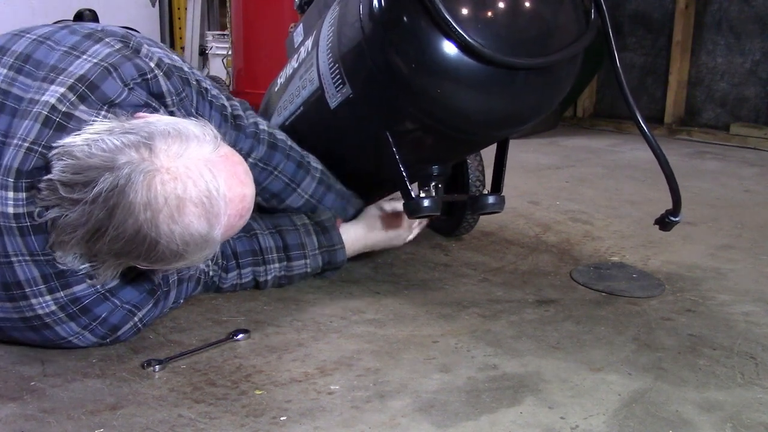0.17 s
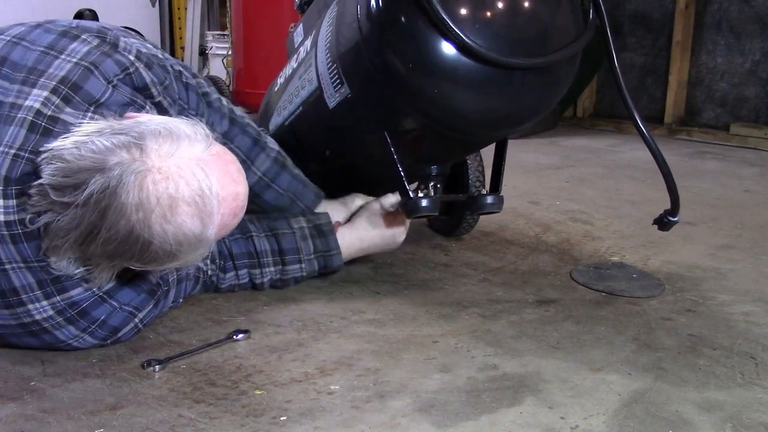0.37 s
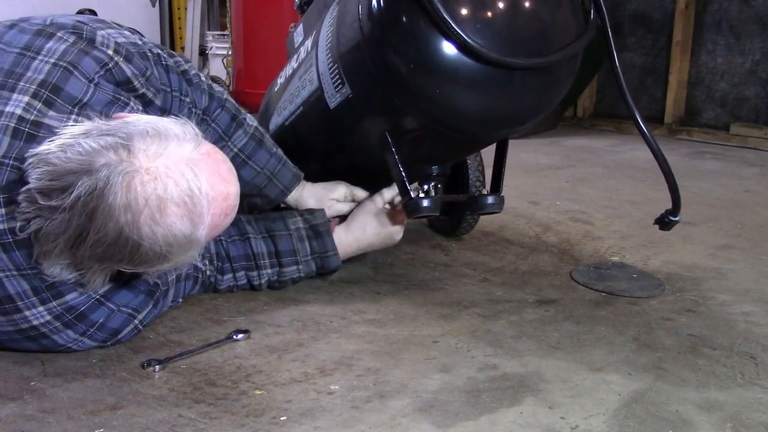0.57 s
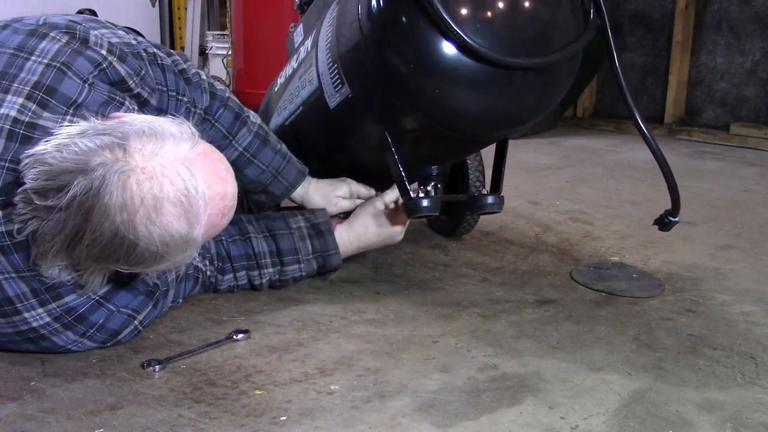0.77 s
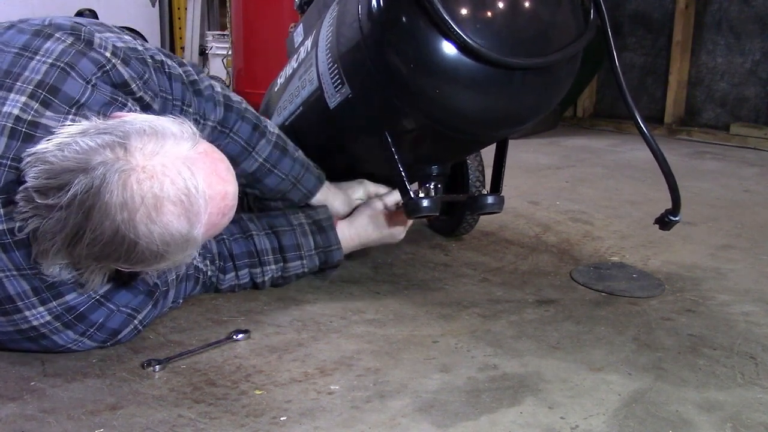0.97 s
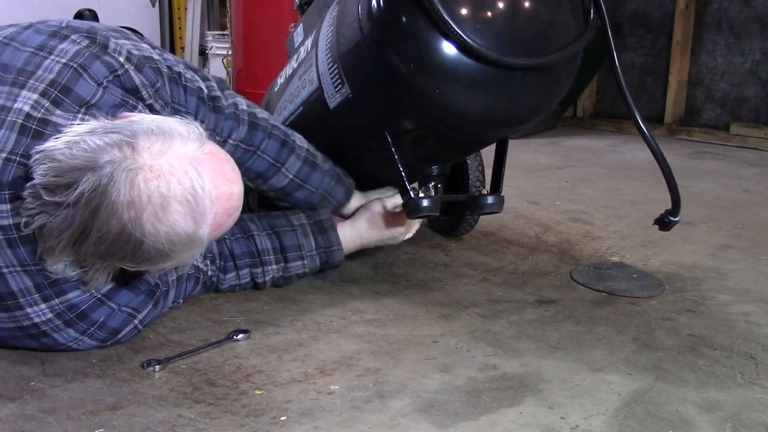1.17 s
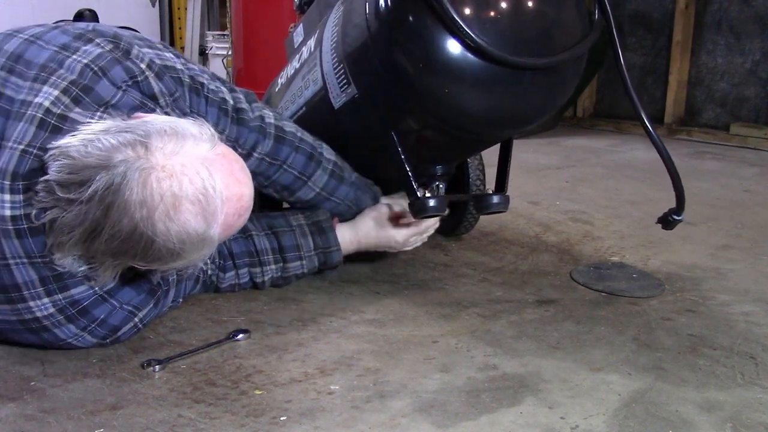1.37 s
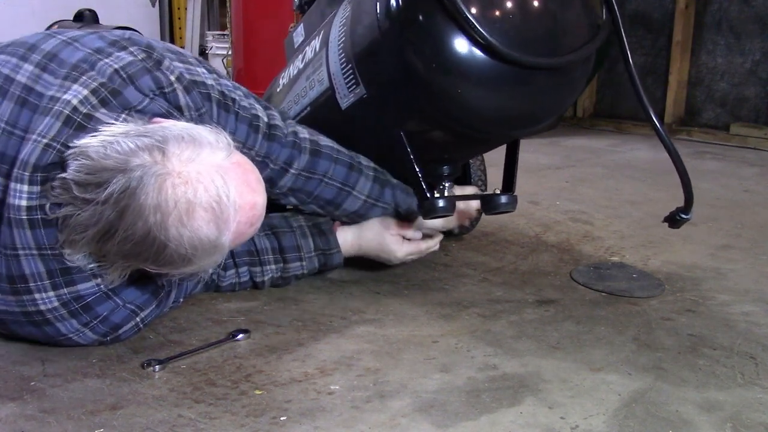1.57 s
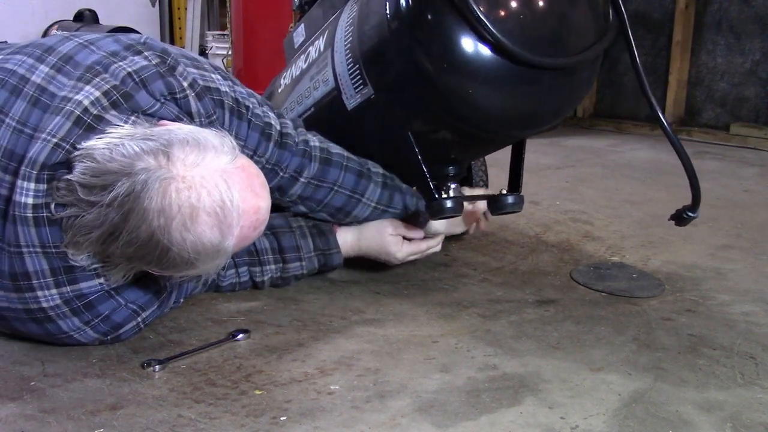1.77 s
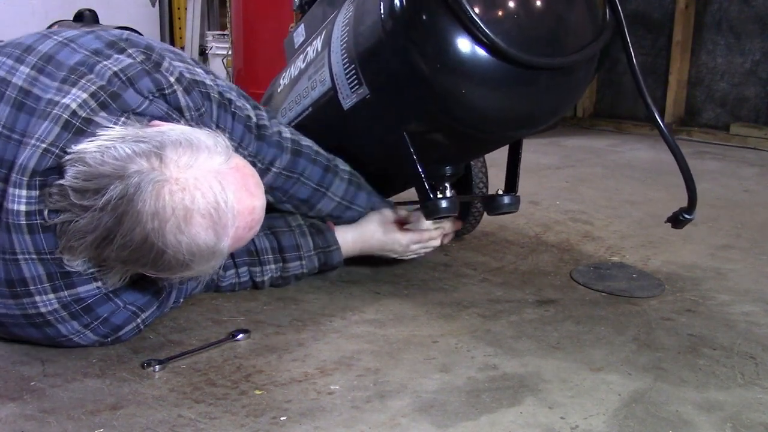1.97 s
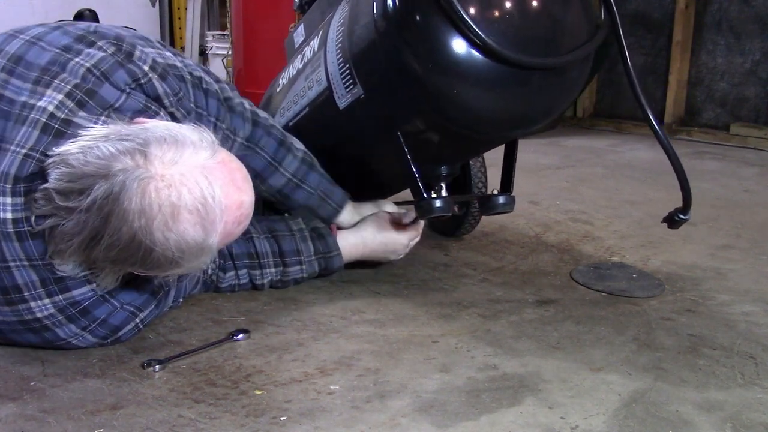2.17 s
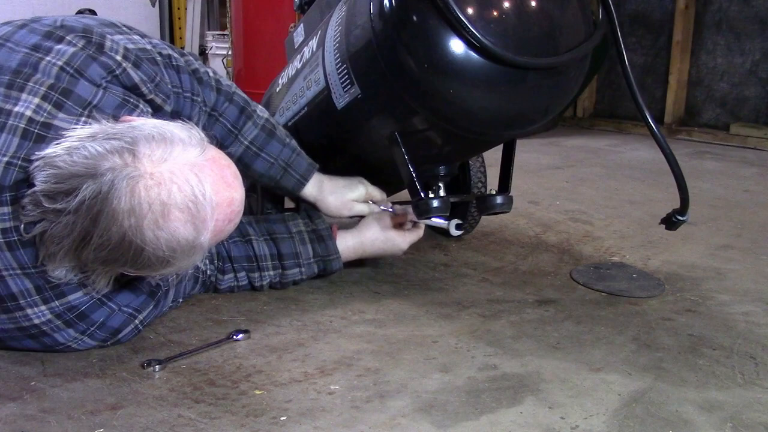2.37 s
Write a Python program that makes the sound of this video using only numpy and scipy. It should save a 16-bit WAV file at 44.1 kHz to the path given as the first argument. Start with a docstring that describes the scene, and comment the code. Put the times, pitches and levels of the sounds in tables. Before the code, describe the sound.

A metal wrench taps and clanks irregularly on a hollow steel tank's drain valve, each knock ringing briefly; air hisses at first, fades, swells faintly near one second, then nearly vanishes; close microphone, concrete-floored workshop.

```python
"""Wrench on a leaking tank valve

A wrench knocks on the drain valve of a steel tank while the last air whistles out, in a concrete-floored workshop.
Each knock ticks in the tool (short modes and a noise crack) and rings many decaying modes of the tank shell.
The hiss of shaped noise is loud at first, dips near 0.7 s, swells to 1.14 s, then stays low.
Room tone, a faint hum and wall reflections surround it."""
import sys
import numpy as np
from scipy import signal
from scipy.fft import rfft, irfft, next_fast_len
from scipy.io import wavfile
from scipy.ndimage import map_coordinates

SR = 44100
rng = np.random.default_rng(int(sys.argv[2]) if len(sys.argv) > 2 else 0)


def write(x):
    x = np.atleast_2d(x).T
    wavfile.write(sys.argv[1], SR, np.round(np.clip(x, -1, 1) * 32767).astype(np.int16))


N = 112455

# Wrench knocks: start_s, relative force_db at 450, 1000, 1600, 2300, 3300, 4700 and 6500 Hz,
# extra low_bell_db, extra high_bell_db, relative tool tick_db
KNOCKS = [(.188, -34, -43.5, -32, -36, -51, -42, -42, -12, 11, -58),
          (.218, -32, -70, -23, -26, -28.5, -10.5, -52, 15, -4, -45),
          (.235, -26.5, -25.5, -18, -18, -20.5, -19.5, -30, 6.5, 14.5, -34),
          (.451, -30, -25.5, -24, -28.5, -32, -33, -26.5, -20, 8.5, -39),
          (.537, -27, -30, -12.5, -15.5, -20, -25, -18, 0.5, -20, -23.5),
          (.602, -36.5, -21, -12.5, -23.5, -38, -22, -20, 7.5, 4, -63),
          (.660, -28, -25.5, -13.5, -10.5, -14, -12, -13.5, -8, 10.5, -13.5),
          (.693, -39.5, -37, -50, -14, -42, -13, -27, -14, -4, -30),
          (.820, -62, -33, -30, -32, -45, -26.5, -37, -7, -2, -47),
          (.830, -27.5, -24.5, -28, -23.5, -28.5, -35.5, -27, 5, 8.5, -52),
          (.858, -37, -24, -31, -39, -52, -41, -44, -14, -10, -48),
          (1.042, -54, -36, -31, -41, -43, -57, -57, 6, -1, -70),
          (1.060, -30, -21.5, -3.5, -12, -7, -11, -19.5, -3.5, 0, -25),
          (1.103, -38, -21, -10.5, -13, -17.5, -13, -35, 2, -25, -43),
          (1.174, -33, -27.5, -22, -24, -19.5, -16.5, -35, -5, -3, -44.5),
          (1.542, -64, -68, -50, -52, -47, -42, -28, -8, -3, -46),
          (1.888, -43, -47, -37, -48, -56, -62, -52, 0, -10, -58),
          (1.901, -32, -30.5, -29, -41, -37, -43, -50, 2, -11, -50),
          (1.916, -39, -43, -20, -32, -19.5, -20, -21.5, -4, -20, -35),
          (1.922, -33.5, -26, -15.5, -13.5, -18.5, -21, -24, -0.5, 8, -66),
          (2.051, -47, -20.5, -39, -23, -37, -22, -28, 10, -8.5, -36.5),
          (2.063, -30, -14, -14.5, -12, -18.5, -13.5, -17, -1, 7, -27),
          (2.227, -29.5, -18.5, -13, -23, -27, -25.5, -23, 3, -23, -26.5)]


def amp(db):
    """Decibels to amplitude ratio."""
    return 10 ** (np.asarray(db) / 20)


def along(points, hz):
    """Interpolate (Hz, value) points on a log frequency axis."""
    point_hz, value = np.transpose(points)
    return np.interp(np.log(hz + 1), np.log(point_hz + 1), value)


def filtered(x, response):
    """Multiply the spectrum of x by a complex response of frequency."""
    size = next_fast_len(N + SR // 2)
    spectrum = rfft(x, size) * response(np.fft.rfftfreq(size, 1 / SR))
    return irfft(spectrum, size)[..., :N]


def wobble(rate_hz):
    """Smooth random curve through rate_hz random knots a second."""
    knots = rng.standard_normal(int(N * rate_hz / SR) + 4)
    return map_coordinates(knots, [np.arange(N) * rate_hz / SR])


def rung(hz, t60_s, gains_db, scatter_db, rise_s, size):
    """Modes build up and decay exponentially; each knock (row) has its own strengths and phases."""
    t = np.arange(size) / SR
    decay_per_s = np.log(1000) / t60_s
    modes = np.exp(np.outer(2j * np.pi * hz - decay_per_s, t)).astype(np.complex64)
    modes = modes * (1 - np.exp(-np.outer(1 / rise_s, t))).astype(np.float32)
    chance = rng.standard_normal((len(gains_db), 2, len(hz)))
    strength = amp(gains_db + scatter_db * chance[:, 0])
    phase = np.exp(10j * chance[:, 1])
    return ((strength * phase).astype(np.complex64) @ modes).imag, t


def laid(rings):
    """Add each ring at the start of its knock."""
    out = np.zeros(N + SR)
    for knock, ring in zip(KNOCKS, rings):
        out[round(knock[0] * SR):][:len(ring)] += ring
    return out[:N]


def workshop():
    """Steady room tone of coloured noise with a faint wavering hum; returns mid and side."""
    # Room tone spectrum: frequency_hz, relative level_db
    floor_points = [(15, -61), (25, -19), (110, -16.5), (156, -8), (254, -3.5), (1010, -8), (2030, -14),
                    (4680, -19.5), (9690, -25), (15700, -32.5)]
    # Room tone width: frequency_hz, side_over_mid_db
    floor_side = [(30, 1), (200, -7), (1000, -13.5), (5000, -13), (14000, -25)]
    floor_rms_db = -52.5  # of the mid
    hum_hz, hum_peak_db, hum_waver_db = 117.5, -66, 3.5

    def colour(f):
        mid_gain = amp(along(floor_points, f))
        return mid_gain * [f > 0, amp(along(floor_side, f))]

    mid, side = filtered(rng.standard_normal((2, N)), colour)
    hum_level = amp(hum_peak_db + hum_waver_db * wobble(23.0))
    hum = hum_level * np.sin(2 * np.pi * hum_hz * np.arange(N) / SR)
    return amp(floor_rms_db) * np.array([mid, side]) / np.std(mid) + [hum, 0 * hum]


def walls(x, t60_points):
    """Room reflections: a noise tail in which each frequency decays at its own speed."""
    hz, t, noise = signal.stft(rng.standard_normal(SR), SR, nperseg=256)
    decay = amp(-60 * t / along(t60_points, hz)[:, None])
    tail = signal.istft(noise * decay, SR, nperseg=256)[1]
    return signal.fftconvolve(x, tail / np.linalg.norm(tail))[:N]


def leak():
    """Turbulent air: a broad rush plus whistling bands, with a drawn level curve and small random flutter."""
    # Leak envelope: time_s, relative level_db
    air = [(0.0, -43.5), (0.218, -45.5), (0.56, -50.5), (0.69, -81), (0.824, -70), (1.14, -54),
           (1.336, -67), (1.6, -68)]
    # Whistling bands: centre_hz, width_hz (of each of two cascaded sections), gain_db
    valve = [(4510, 530, 18), (7440, 960, 12), (10330, 770, 2), (12400, 2200, -3.5)]
    # Broad rush: frequency_hz, gain_db
    jet = [(60, -57), (150, 12), (400, 15.5), (1000, 4), (2500, 5), (4000, 15.5), (6000, -3), (12000, -10),
           (15000, -17)]
    time_s, level_db = np.transpose(air)
    level_db = np.interp(np.arange(N) / SR, time_s, level_db)
    level = amp(level_db + 1.4 * wobble(12.0) + 0.39 * wobble(69))

    def bands(f):
        total = 0
        for k, (centre, width, gain_db) in enumerate(valve):
            section = 1j * f * width / (centre ** 2 - f * f + 1j * f * width)
            total = total + (-1) ** k * amp(gain_db) * section ** 2
        return total

    noise = rng.standard_normal((2, N))
    whistle = filtered(noise[0], bands)
    rush = filtered(noise[1], lambda f: amp(along(jet, f)))
    return level * (whistle + rush)


def wrench():
    """Short bright ticks: the tool's fast-decaying modes plus a crack of differentiated noise."""
    # Tool modes: frequency_hz, relative level_db, t60_s
    tool = [(4810, 4.5, 0.036), (5520, 3, 0.019), (7830, -4.5, 0.019), (8520, -3, 0.028), (9330, -7, 0.012),
            (12640, -5.5, 0.011)]
    crack_db, crack_t60_s, lowpass_hz = 2.5, 0.0043, 11200
    rise_s = 0.00051
    hz, db, t60_s = np.transpose(tool)
    tick_db = np.array(KNOCKS)[:, -1:]
    rings, t = rung(hz, t60_s, tick_db + db, scatter_db=2.5, rise_s=3.1 / hz, size=SR // 8)
    crack = np.diff(rng.standard_normal(rings.shape), prepend=0)
    crack = crack * amp(tick_db + crack_db - 60 * t / crack_t60_s)
    ticks = laid((rings + crack) * (1 - np.exp(-t / rise_s)))

    def lowpass(f):
        ratio = f / lowpass_hz
        return 1 / (1 - ratio ** 2 + 1j * ratio) ** 2

    return filtered(ticks, lowpass)


def tank(count=480):
    """Strong shell modes over weak ones spread up to 13.65 kHz; two bell modes swell more slowly."""
    # Frequencies of the strong modes: frequency_hz
    shell_hz = [347, 455, 515, 668, 855, 977, 1015, 1395, 1585, 1707, 1790, 1915, 2085, 2196, 2239, 2342,
                2407, 2510, 2552, 2593, 2729, 3128, 3354, 3770, 4650]
    # The same strong modes: relative level_db, t60_s
    shell = [(16.5, 0.21), (8, 1), (11.5, 0.72), (5.5, 0.41), (12.5, 0.28), (10, 0.39), (15, 0.29),
             (13, 0.096), (3.5, 0.21), (4, 0.37), (10, 0.12), (6.5, 0.51), (13, 0.19), (10, 0.19),
             (-4, 0.13), (6, 0.35), (-1.5, 0.66), (9, 0.31), (1.5, 0.49), (2.5, 0.56), (1, 0.61),
             (2.5, 0.32), (7, 0.32), (6, 0.21), (7, 0.24)]
    # Weak mode levels: frequency_hz, relative level_db
    crowd_levels = [(120, -17), (250, -7.5), (450, 0.5), (600, -5), (1000, 0), (1500, -6), (2300, 3),
                    (3200, 1.5), (3950, -6), (4700, -3), (5350, -8), (5900, -12.5), (6800, -19),
                    (10000, -39.5), (14000, -52)]
    # Weak mode decay before random spread: frequency_hz, t60_s
    crowd_t60 = [(200, 0.52), (700, 0.39), (2000, 0.29), (4500, 0.35), (7000, 0.18), (13000, 0.85)]
    # Frequencies of the knock force columns: frequency_hz
    force_hz = [450, 1000, 1600, 2300, 3300, 4700, 6500]
    # The two bell modes, low and high: frequency_hz
    bell_hz = [515, 1015]
    # Their build-up time constants: rise_s
    bell_rise_s = [0.0068, 0.034]
    shell_db, scatter_db, t60_spread = -17, 2, 0.22
    rise_cycles, highpass_hz = 2.27, 104.4
    chatter_db, chatter_hz = 1.5, 140

    crowd_hz = 150 + 13500 * ((np.arange(count) + rng.random(count)) / count) ** 2
    strong_db, strong_t60_s = np.transpose(shell)
    hz = np.r_[shell_hz, crowd_hz]
    db = np.r_[strong_db, along(crowd_levels, crowd_hz)]
    weak_t60_s = along(crowd_t60, crowd_hz) * np.exp(t60_spread * rng.standard_normal(count))
    t60_s = np.r_[strong_t60_s, weak_t60_s]

    force_db = []
    for _, *dbs, low_db, high_db, _ in KNOCKS:
        bell_db = low_db * (hz == min(bell_hz)) + high_db * (hz == max(bell_hz))
        force_db.append(along(list(zip(force_hz, dbs)), hz) + bell_db)

    bell = np.isin(hz, bell_hz)
    rise_s = np.where(bell, np.interp(hz, bell_hz, bell_rise_s), rise_cycles / hz)
    rings, t = rung(hz, t60_s, shell_db + db + np.array(force_db), scatter_db * ~bell, rise_s, SR * 3 // 4)
    rings = laid(rings * np.minimum(1, 10 * (t[-1] - t)))  # 0.1 s fade-out

    # The loose tool damps the shell unevenly: the treble flickers
    treble = filtered(rings, lambda f: f > 1200)
    rings = rings + treble * (amp(chatter_db * wobble(chatter_hz)) - 1)
    return filtered(rings, lambda f: (1j * f / (highpass_hz + 1j * f)) ** 2)


def scene():
    """Tank, wrench and leak in the centre; reflections and room tone spread as mid and side."""
    # Mid reflections: frequency_hz, t60_s
    room = [(200, 2.55), (2000, 1.15), (5000, 1.22), (10000, 0.43)]
    # Side reflections from the nearest walls: frequency_hz, t60_s
    side_room = [(200, 0.1), (2000, 0.14), (10000, 0.12)]
    # Colour of the side reflections: frequency_hz, gain_db
    side_colour = [(250, -19), (1000, 1.5), (4000, 5.5), (6000, 9), (8500, 2.5), (14000, 10)]
    room_db, room_side_db, left_db = -21.5, -24.5, 0.16
    near = tank() + wrench() + leak()
    room_mid = amp(room_db) * walls(near, room)
    room_side = amp(room_side_db) * walls(near, side_room)
    room_side = filtered(room_side, lambda f: amp(along(side_colour, f)))
    mid, side = [room_mid, room_side] + workshop()
    return amp([[left_db], [-left_db]]) * np.array([near + mid + side, near + mid - side])


def record(dry):
    """Gain sinks as smoothed power rises, then peaks are rounded and the treble is cut at a band limit."""
    duck_from_db, duck_share, smoothing_s = -37, 0.16, 1
    ceiling, top_hz = .93, 15850
    keep = np.exp(-1 / (smoothing_s * SR))
    power = signal.lfilter([1 - keep], [1, -keep], np.mean(dry ** 2, axis=0))
    excess_db = np.maximum(0, 10 * np.log10(power + 1e-12) - duck_from_db)
    ducked = dry * amp(-duck_share * excess_db)
    rounded = ducked / (1 + np.abs(ducked / ceiling) ** 8) ** .125
    return filtered(rounded, lambda f: f < top_hz)


dry = scene()
out = record(dry)
write(out)
```